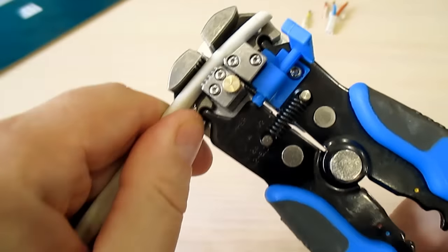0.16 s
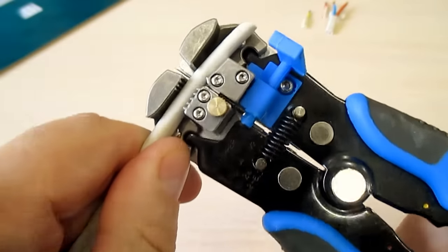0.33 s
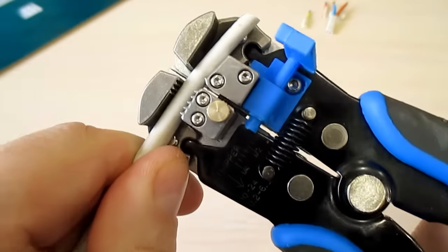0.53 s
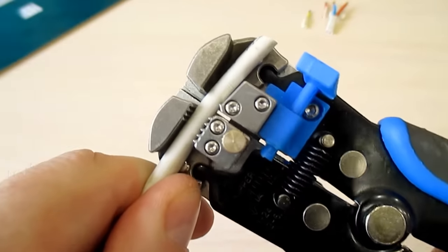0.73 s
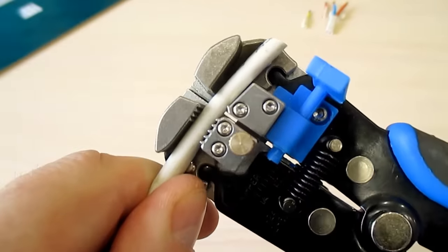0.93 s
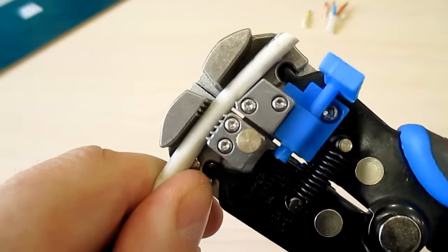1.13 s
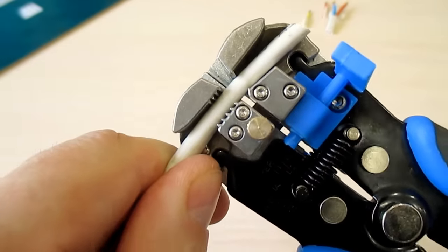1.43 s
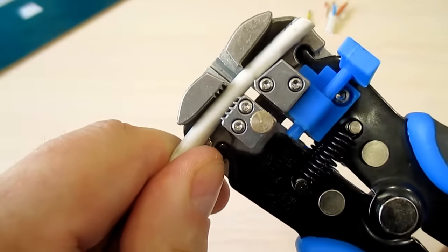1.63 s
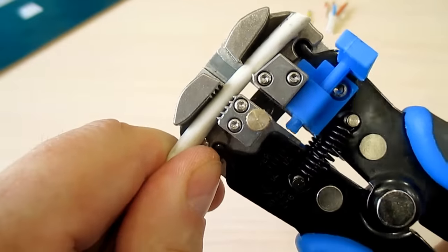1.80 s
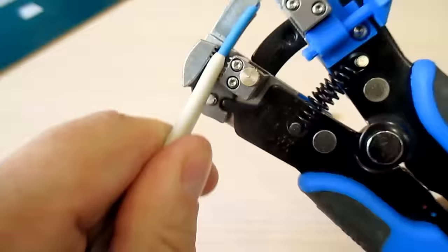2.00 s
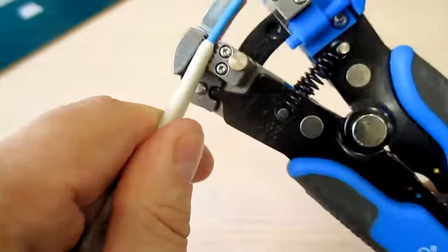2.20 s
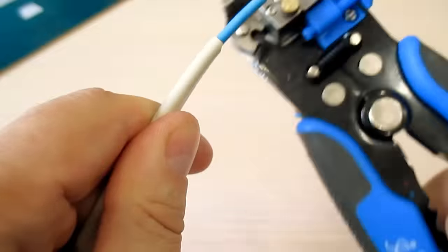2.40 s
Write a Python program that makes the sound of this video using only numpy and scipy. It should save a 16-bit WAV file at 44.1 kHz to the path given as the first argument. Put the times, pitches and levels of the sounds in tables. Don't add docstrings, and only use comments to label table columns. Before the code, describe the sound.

Hand-held cable stripper slides, quietly creaks, then cracks sharply and clatters closed with two clicks

```python
import sys
import numpy as np
from scipy import signal
from scipy.fft import rfft, irfft, next_fast_len
from scipy.io import wavfile
from scipy.ndimage import uniform_filter1d, map_coordinates

SR = 44100
rng = np.random.default_rng(int(sys.argv[2]) if len(sys.argv) > 2 else 0)


def ratio(d):
    e = np.asarray(d, float) / 20
    return 10 ** e


def put_to_file(sound):
    columns = np.atleast_2d(sound).T
    safe = np.clip(columns, -1, 1)
    whole_steps = np.round(safe * 32767)
    wavfile.write(sys.argv[1], SR, whole_steps.astype(np.int16))


N = 112454
QUIET_TOP_HZ = 15800
STEEL_FOCUS_DB, DESK_FOCUS_DB, CREAK_FOCUS_DB = 14, 11, 17
STEEL_SOFT_HZ, SHUT_SOFT_HZ, DESK_SOFT_HZ, CREAK_SOFT_HZ = 30000, 22300, 5560, 9000

# (time [s], peak level [dB], loudest frequency [Hz], scrape T60 [s])
DESK_TAPS = [(.2500, -43, 2250, 0.043), (.2598, -37, 1050, 0.018), (.2625, -36.5, 2250, .015),
             (.272, -37.5, 1800, .015), (.2752, -32.5, 2230, 0.013), (2.2623, -18.5, 1580, 0.0038),
             (2.2640, -19, 2910, 0.0034), (2.2660, -26.5, 1400, 0.0046), (2.2664, -28, 2800, .004),
             (2.2700, -28.5, 800, 0.01), (2.2732, -28.5, 790, 0.0078), (2.2752, -25, 2680, 0.0033),
             (2.2736, -38, 7300, .004), (2.2795, -28.5, 1300, 0.0065), (2.291, -35, 910, 0.0052)]
KNOCK_COUNT = 5


def along(points, hz):
    f, v = np.transpose(points)
    return np.interp(np.log(hz + 1), np.log(f + 1), v)


def unit(x):
    return x / np.sqrt(np.mean(x ** 2) + 1e-20)


def filtered(x, response):
    m = next_fast_len(len(x) + 8192)
    f = np.fft.rfftfreq(m, 1 / SR)
    return irfft(rfft(x, m) * response(f), m)[:len(x)]


def body(peaks, f):
    total = 0
    for k, (center_hz, width_hz, db) in enumerate(peaks):
        damping = 1j * f * width_hz
        total = total + (-1) ** k * ratio(db) * damping / (center_hz ** 2 - f * f + damping)
    return total


def damped_sines(rows, attack_s):
    out = np.zeros(N + SR)
    t = np.arange(SR // 2) / SR
    for s, db, hz, t60 in rows:
        mode = ratio(db - 60 * t / t60) * np.sin(2 * np.pi * hz * t)
        out[round(s * SR):][:len(t)] += mode * (1 - np.exp(-t / attack_s))
    return out[:N]


def room(x, wet_db):
    # (frequency [Hz], T60 [s])
    decay = [(200, 0.83), (1000, 0.49), (3500, 0.36), (8000, 0.31), (12000, 0.25), (15000, 0.19)]
    # (frequency [Hz], level [dB])
    walls = [(300, -2), (1300, -0.5), (2000, -1), (2600, -4.5), (3600, -0.5), (6000, 0), (12500, -3.5),
             (15000, 2.5)]
    hz, t, z = signal.stft(rng.standard_normal(SR // 2), SR, nperseg=256)
    fade = ratio(-60 * t / along(decay, hz)[:, None])
    color = ratio(along(walls, hz)) * (hz < QUIET_TOP_HZ)
    tail = signal.istft(z * fade * color[:, None], SR, nperseg=256)[1]
    buildup_s = 0.0014
    tail = tail * (1 - np.exp(-np.arange(len(tail)) / SR / buildup_s))
    wet = signal.fftconvolve(x, tail / np.linalg.norm(tail))[:len(x)]
    return x + ratio(wet_db) * wet


def contacts(rows, peaks, soft_hz, focus_db, wet_db):
    strike, rise_s, focus_width = 4, .0002, .22
    out = np.zeros(N + SR)
    t = np.arange(2000) / SR
    for s, db, hz, t60 in rows:
        scrape = rng.standard_normal(len(t)) * (1 - np.exp(-t / rise_s))
        drive = (scrape + strike * (t == 0)) * ratio(-60 * t / t60)

        def response(f):
            focus = 1 + body([(hz, focus_width * hz, focus_db)], f)
            return body(peaks, f) * focus / (1 + 1j * f / max(soft_hz, hz)) ** 3

        hit = filtered(drive, response)
        hit = ratio(db) * hit / np.abs(hit).max()
        out[round(s * SR):][:SR // 2] += room(np.pad(hit, (0, SR // 2 - len(t))), wet_db)
    return out[:N]


def air():
    # (frequency [Hz], level [dB])
    hush_color = [(20, -6), (124, -2.5), (400, -12.5), (1110, -14.5), (1700, -20.5), (6000, -30),
                  (10000, -42), (16400, -52)]
    hush_db = -54
    hum_hz, hum_width_hz, hum_db = 119, 16, -64
    whine_hz, whine_db = 11800, -84
    z = signal.stft(rng.standard_normal(N), nperseg=512)[2]
    lumps = uniform_filter1d(uniform_filter1d(rng.standard_normal(z.shape), 4, 0), 8, 1)
    hush = signal.istft(z * ratio(0.37 * unit(lumps)), nperseg=512)[1][:N]
    hush = unit(filtered(hush, lambda f: ratio(along(hush_color, f))))
    hum = unit(filtered(rng.standard_normal(N), lambda f: body([(hum_hz, hum_width_hz, 0)], f) ** 2))
    drift_hz = 6 * map_coordinates(rng.standard_normal(60), [np.arange(N) * 20 / SR])
    whine = np.sin(2 * np.pi * np.cumsum(whine_hz + drift_hz) / SR)
    return ratio(hush_db) * hush + ratio(hum_db) * hum + ratio(whine_db) * whine


def grit():
    wander_db = 1.3 * map_coordinates(rng.standard_normal(400), [np.arange(N) / SR * 60])
    return ratio(wander_db) * rng.standard_normal(N)


def slide():
    # (time [s], rubbing level [dB])
    rubbing = [
        (0.0, -58),
        (0.006, -58.5),
        (0.092, -46),
        (0.246, -49.5),
        (0.277, -42.5),
        (0.302, -70),
        (0.36, -72),
    ]
    # (frequency [Hz], width [Hz], level [dB])
    resonances = np.array([(177.7, 15.6, 0), (354, 23.6, 0.5), (666, 24, 0), (851, 24, -5), (1000, 87, -14),
                           (1484, 90, -16), (1720, 170, -15), (2250, 73, -8), (2900, 96, -21.5),
                           (4200, 130, -29), (3400, 200, -28.5), (5250, 89, -23), (6050, 110, -31),
                           (7730, 300, -32), (14000, 100, -55), (14200, 100, -40)])
    brighten_db_per_s = 17
    s, db = np.transpose(rubbing)
    t = np.arange(N) / SR
    is_tool = resonances[:, 0] > 1700
    desk = filtered(grit(), lambda f: body(resonances[~is_tool], f) + ratio(-22.0) / (1 + 1j * f / 4000) ** 3)
    tool = filtered(grit(), lambda f: body(resonances[is_tool], f))
    rub = desk + tool * ratio(brighten_db_per_s * np.clip(t - .17, -1, .1))
    return rub / desk.std() * ratio(np.interp(t, s, db, right=-120))


def creaks():
    # (time [s], peak level [dB], loudest frequency [Hz], scrape T60 [s])
    slips = [(.054, -45, 3050, .03), (.085, -54, 9000, .02), (.2595, -43, 8500, .012),
             (.584, -52, 6000, .015), (.735, -49, 2000, .012), (.9957, -45, 6300, .004),
             (.997, -46, 1200, .004), (1.4681, -46, 8500, .006), (1.470, -52, 5500, .04),
             (2.002, -50, 4000, .006), (2.011, -47, 3600, .012)]
    # (frequency [Hz], width [Hz], level [dB])
    handles = [(2000, 1900, -9), (6400, 5600, -9), (14000, 2700, -3)]
    return contacts(slips, handles, CREAK_SOFT_HZ, CREAK_FOCUS_DB, -3.0)


def knock():
    # (frequency [Hz], width [Hz], level [dB])
    tool_on_desk = [(350, 200, 0), (1050, 160, 5.5), (1800, 350, 3), (2250, 230, 5.5), (4000, 2000, -6),
                    (7500, 2500, -5)]
    return contacts(DESK_TAPS[:KNOCK_COUNT], tool_on_desk, DESK_SOFT_HZ, DESK_FOCUS_DB, -10)


def thuds():
    # (time [s], peak level [dB], frequency [Hz], T60 [s])
    pushes = [(.2855, -27.5, 253, 0.025), (.291, -30, 164.6, 0.18), (2.0225, -11.5, 380, 0.0049),
              (2.0295, -5, 361, 0.015), (2.0298, -14, 775, 0.028), (2.035, -23.5, 240, 0.035),
              (2.030, -27, 123, 0.082), (2.035, -19, 554, 0.02), (2.099, -33, 200, 0.033),
              (2.2, -54.5, 90, 0.42), (2.347, -20.5, 380, 0.011), (2.346, -36, 148, 0.042),
              (2.411, -24.5, 300, 0.0092)]
    return room(damped_sines(pushes, 0.0013), -29.5)


def snap():
    # (time [s], peak level [dB], loudest frequency [Hz], scrape T60 [s])
    blows = [(2.0222, -19.5, 3570, .008), (2.0222, -27.5, 15200, 0.01), (2.0224, -24.5, 1500, 0.0056),
             (2.0243, -18.5, 4200, 0.0063), (2.0291, -1.5, 6400, 0.0017), (2.0294, -3.5, 3500, .002),
             (2.0290, -8, 15300, 0.0027), (2.0291, -12.5, 10800, 0.0029), (2.0345, 1.5, 2550, 0.0024),
             (2.0347, -1.5, 3400, 0.004), (2.0344, -3, 6500, 0.0032), (2.0344, -12, 13500, 0.0028),
             (2.0362, -5, 3700, 0.01), (2.0364, -14.5, 7500, .01), (2.0388, -10, 3700, 0.0068),
             (2.0417, -6, 3800, .01), (2.0417, -14, 8500, .005), (2.0474, -7, 5900, .008),
             (2.0474, -21, 9300, .006), (2.0478, -13.5, 2500, 0.0073), (2.0500, -14, 3800, 0.0088),
             (2.0565, -28, 7000, .01), (2.0590, -20.5, 6160, .015), (2.0592, -31, 8500, .01),
             (2.0940, -29.5, 9000, 0.0037), (2.0942, -23, 3700, .006)]
    # (frequency [Hz], width [Hz], level [dB])
    jaws = [(1010, 540, -9.5), (1590, 410, -8), (2550, 1000, -6), (3680, 360, -2), (4390, 660, -4),
            (6210, 960, -8), (7000, 920, -6.5), (8500, 2000, -10), (10660, 1900, -12), (13500, 1800, -16.5),
            (15300, 900, -14)]
    return contacts(blows, jaws, STEEL_SOFT_HZ, STEEL_FOCUS_DB, -18.5)


def steel_ring():
    # (frequency [Hz], level [dB], T60 [s])
    modes = [(2120, -42, 0.39), (2370, -35.5, 0.24), (3430, -46, 0.32), (3560, -40.5, .35),
             (3700, -48, 0.42), (3770, -40, 0.31), (5421, -40, 0.067)]
    start_s = 2.036
    return damped_sines([(start_s, db, hz, t60) for hz, db, t60 in modes], .004)


def jacket_drop():
    # (frequency [Hz], width [Hz], level [dB])
    desk = [(680, 264, 7), (1050, 260, 4), (1514, 610, 4), (2500, 500, 5), (3290, 1100, 1.5),
            (5200, 1500, -28), (7300, 800, -20)]
    return contacts(DESK_TAPS[KNOCK_COUNT:], desk, DESK_SOFT_HZ, DESK_FOCUS_DB, -7.5)


def shut():
    # (time [s], peak level [dB], loudest frequency [Hz], scrape T60 [s])
    clicks = [(2.3270, -41, 5400, .003), (2.3400, -39, 4800, 0.047), (2.3452, -11, 6000, .005),
              (2.3460, -8, 2100, 0.0054), (2.3463, -4, 4300, 0.0037), (2.3466, -11, 7400, 0.0034),
              (2.3464, -16.5, 11000, .003), (2.3486, -11.5, 3900, 0.0047), (2.3487, -15.5, 6220, 0.007),
              (2.3485, -19, 1900, 0.0065), (2.3513, -24, 4500, .003), (2.3544, -12.5, 4500, 0.0025),
              (2.3550, -27, 1500, .015)]
    # (frequency [Hz], width [Hz], level [dB])
    closed_jaws = [(1400, 770, -8.5), (2090, 670, -4), (4300, 840, -3), (5000, 840, -3.5),
                   (6500, 1500, -5.5), (7800, 1600, -7), (11000, 1800, -13), (14200, 1800, -18)]
    return contacts(clicks, closed_jaws, SHUT_SOFT_HZ, STEEL_FOCUS_DB, -16)


def latch():
    # (time [s], peak level [dB], loudest frequency [Hz], scrape T60 [s])
    catches = [(2.4023, -30, 6000, .012), (2.4033, -26, 2000, 0.0069), (2.4050, -28, 3000, .006),
               (2.4061, -14, 4570, 0.0033), (2.4073, -8, 2900, 0.0033), (2.4072, -19.5, 8100, 0.0047),
               (2.4099, -13.5, 4500, 0.0058), (2.4106, -11, 7800, 0.0072), (2.4108, -20, 2500, 0.007),
               (2.4119, -6, 3550, .006), (2.4122, -13, 6500, .005), (2.4137, -14, 3100, .006),
               (2.4171, -15.5, 3030, 0.0055), (2.4172, -22, 8500, 0.0032), (2.4182, -18.5, 4000, 0.01),
               (2.4222, -31, 2200, .006), (2.4520, -26, 5000, .004)]
    # (frequency [Hz], width [Hz], level [dB])
    latched_jaws = [(1300, 700, -10.5), (2100, 450, -1.5), (3100, 1000, -3), (3700, 780, -3),
                    (4700, 1200, -4.5), (6500, 1500, -6.5), (8270, 1250, -7), (11000, 2000, -16.5),
                    (14400, 2500, -18)]
    return contacts(catches, latched_jaws, SHUT_SOFT_HZ, STEEL_FOCUS_DB, -16)


def duck():
    start_s, fall_s, depth_db, recover_db_per_s = 2.032, 0.0034, -12, 3
    t = np.arange(N) / SR - start_s
    return ratio(np.clip(t / fall_s, 0, 1) * np.minimum(depth_db + recover_db_per_s * t, 0))


def scene():
    near = snap() + steel_ring() + thuds() + shut() + latch() + knock() + jacket_drop()
    quiet = slide() + air() + creaks()
    return (near / duck() + filtered(quiet, lambda f: f < QUIET_TOP_HZ))[None]


def low_pass(x):
    return signal.sosfilt(signal.butter(12, 16570, fs=SR, output="sos"), x)


def record(dry):
    overload, mic_hz = 1.04, 16300
    x = dry[0] * duck()
    x = x / (1 + np.abs(x / overload) ** 8) ** (1 / 8)
    x = filtered(x, lambda f: 1 / np.sqrt(1 + (f / mic_hz) ** 40))
    return low_pass(np.clip(x, -1, 1)[None])


dry = scene()
out = record(dry)
put_to_file(out)
```